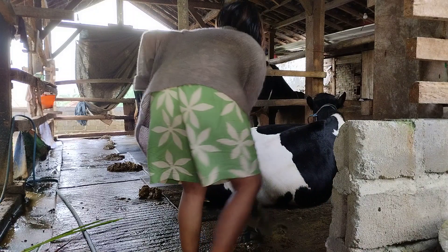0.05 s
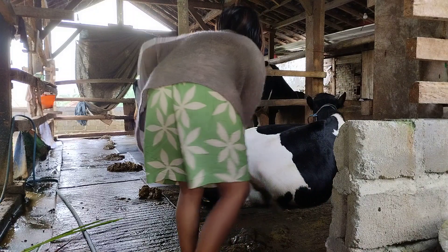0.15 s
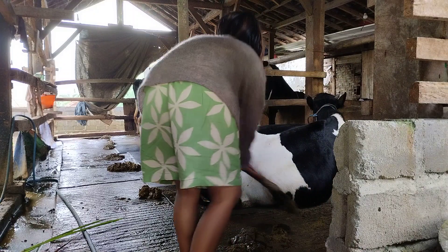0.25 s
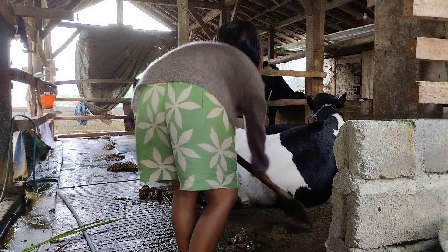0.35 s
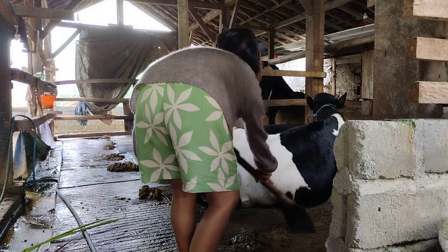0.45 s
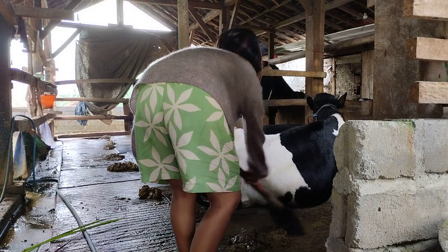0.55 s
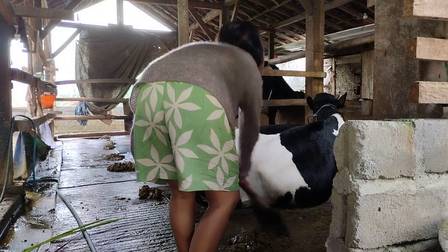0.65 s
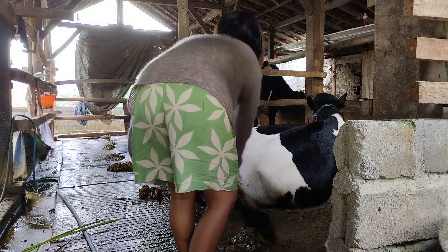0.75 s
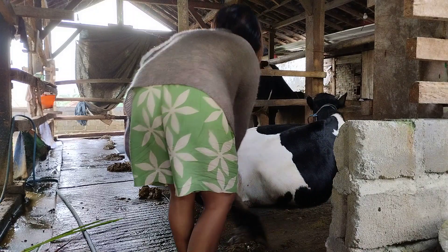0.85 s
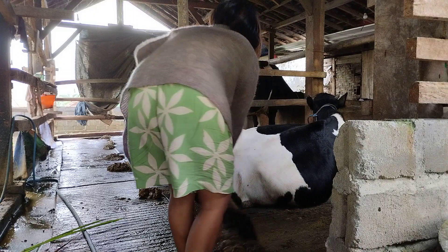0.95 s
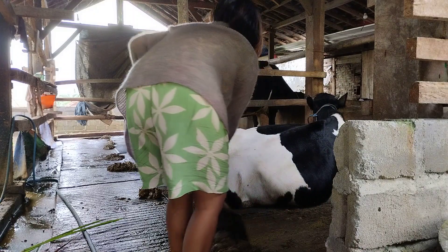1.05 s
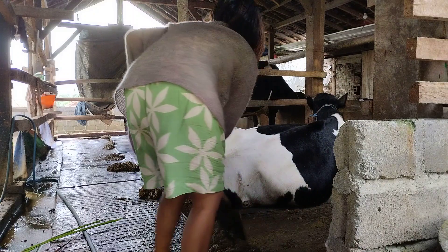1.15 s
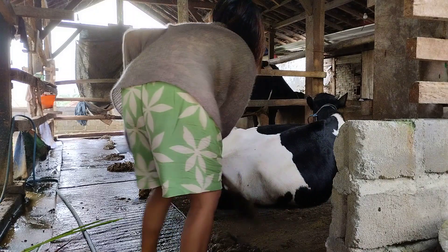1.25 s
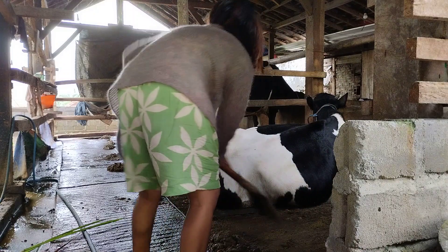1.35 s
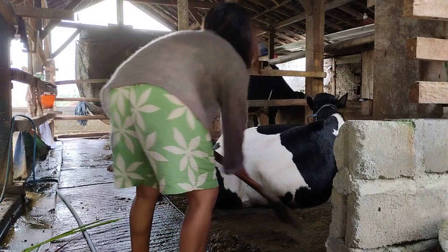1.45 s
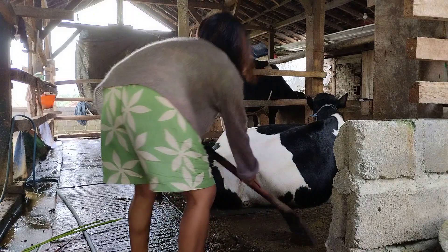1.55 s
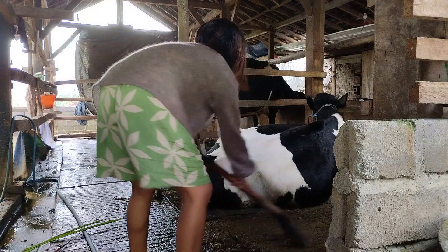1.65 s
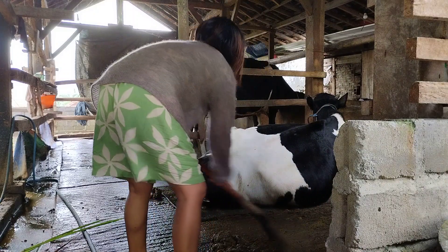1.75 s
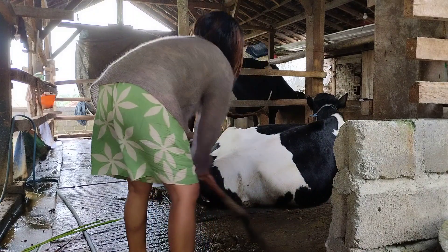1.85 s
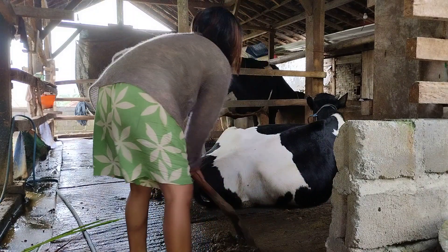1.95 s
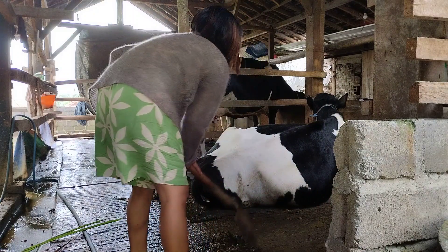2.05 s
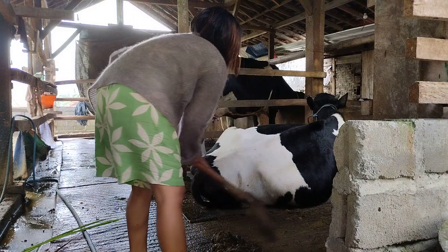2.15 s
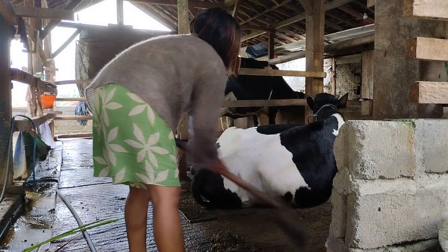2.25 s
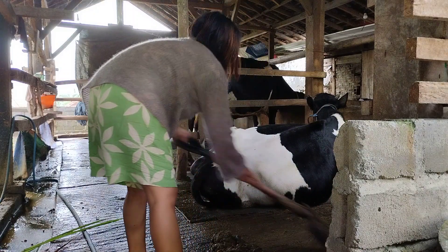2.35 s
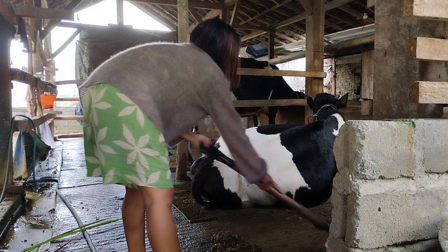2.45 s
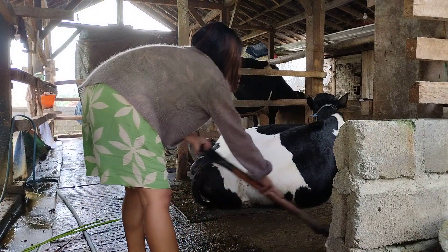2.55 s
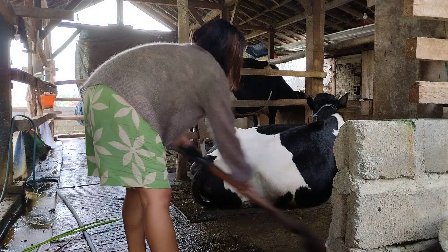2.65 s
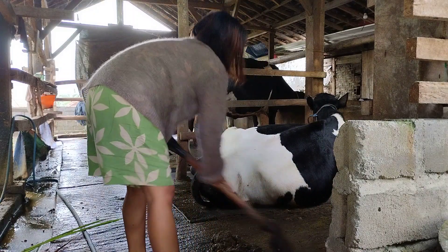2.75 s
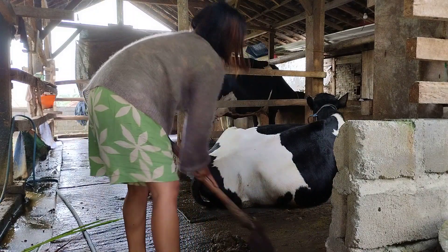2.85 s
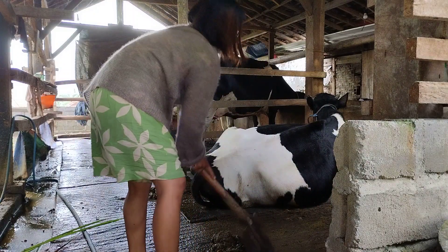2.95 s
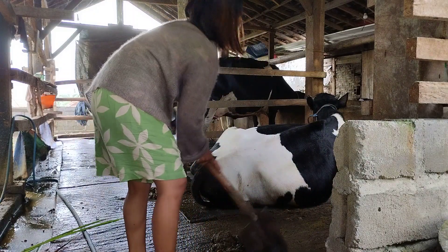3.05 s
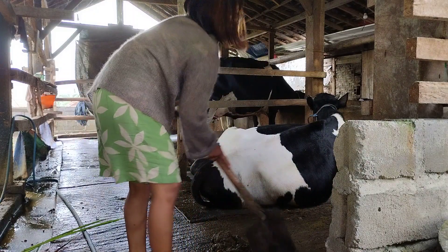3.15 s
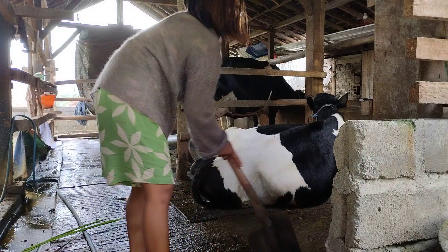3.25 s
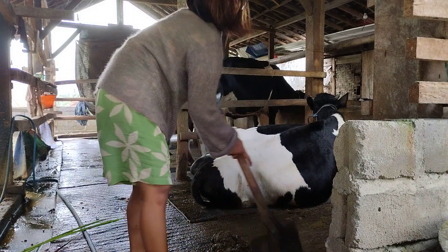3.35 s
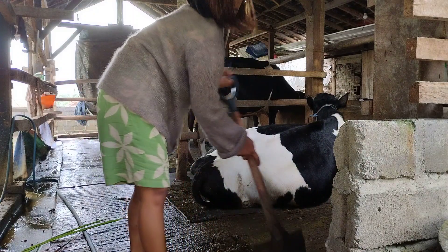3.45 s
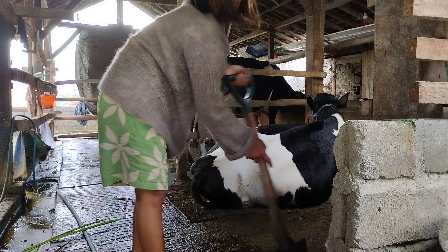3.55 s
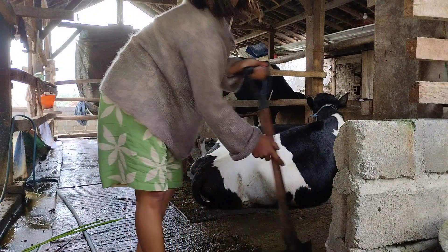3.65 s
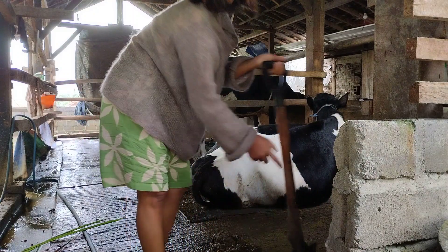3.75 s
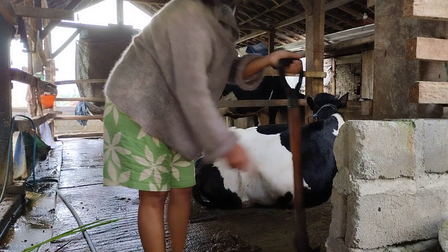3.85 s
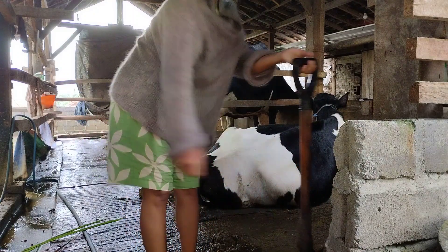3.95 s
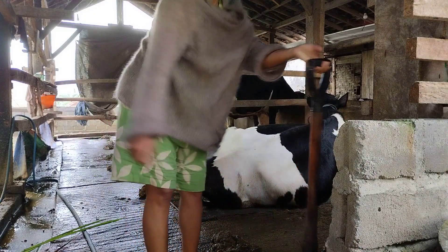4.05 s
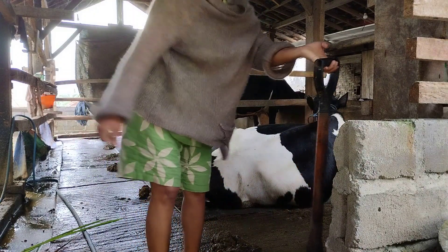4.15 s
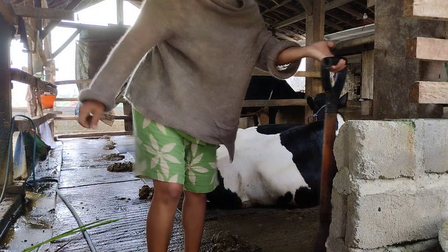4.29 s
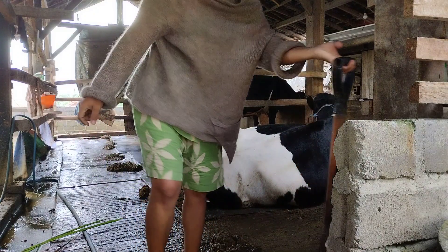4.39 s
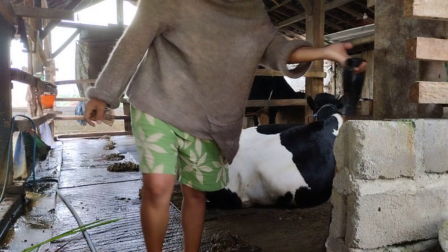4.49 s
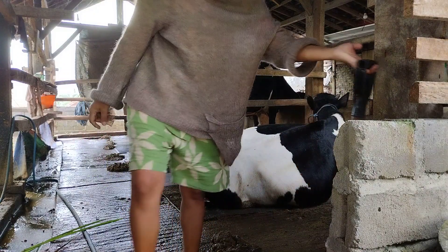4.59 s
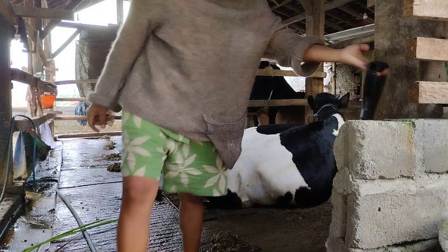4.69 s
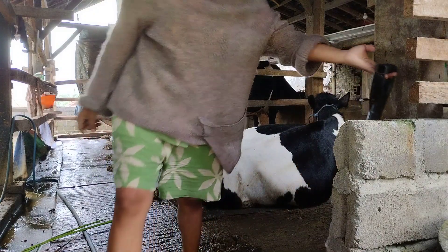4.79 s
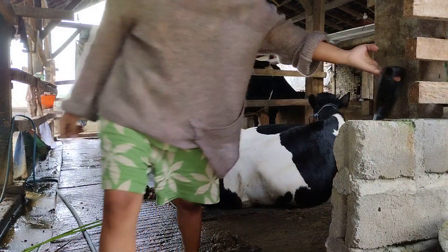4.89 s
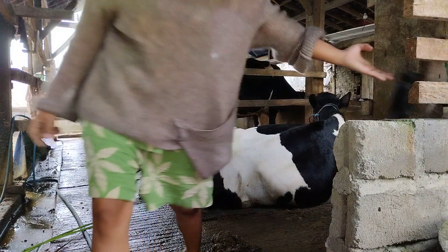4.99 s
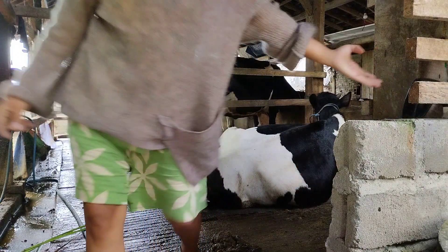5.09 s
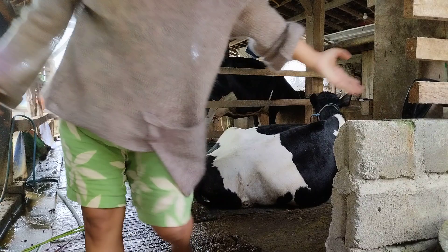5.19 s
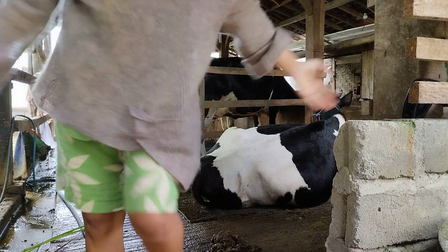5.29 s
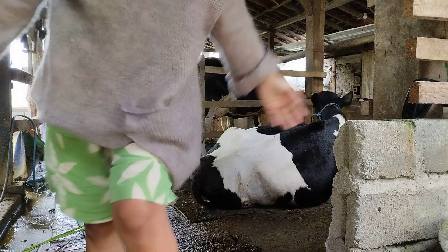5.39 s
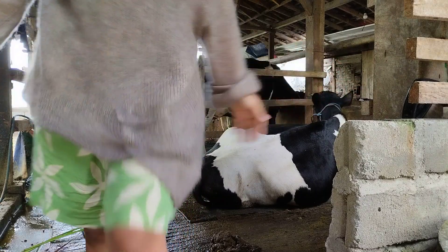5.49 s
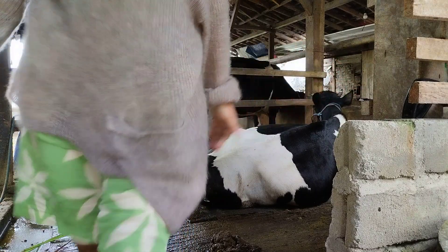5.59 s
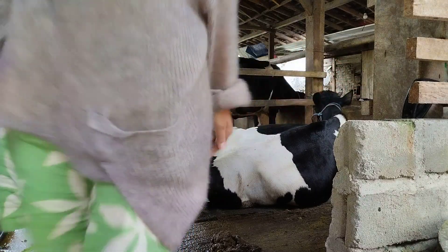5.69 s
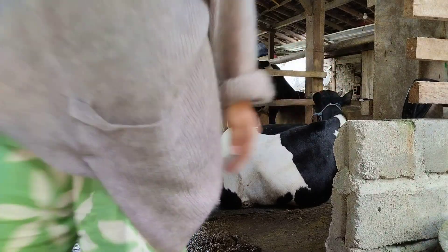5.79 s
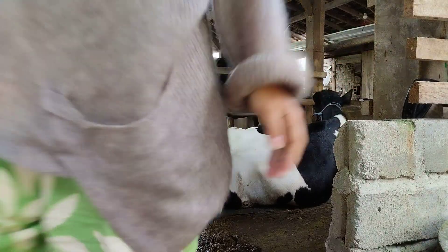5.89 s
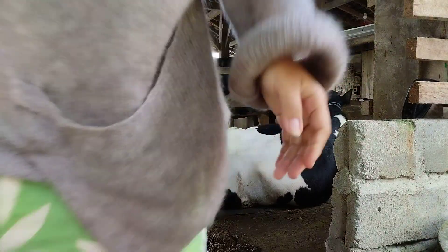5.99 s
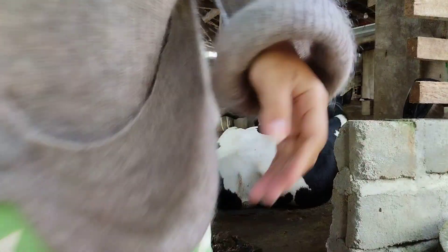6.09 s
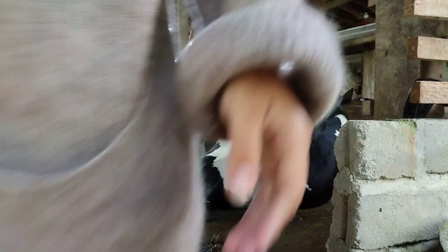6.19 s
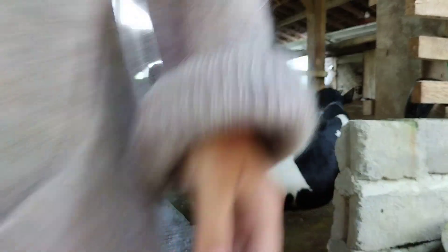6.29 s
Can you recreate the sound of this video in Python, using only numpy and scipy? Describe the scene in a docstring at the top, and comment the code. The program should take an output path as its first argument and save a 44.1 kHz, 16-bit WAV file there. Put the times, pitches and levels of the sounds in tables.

```python
"""A steel shovel lands on wet concrete, is pushed three times through muck and stood upright, then its
wooden handle knocks a block wall: blows and drag noise ring blade resonances, grit is grainy noise.
Around it in an open cowshed, small neck bells tinkle and far birds chirp (decaying and sliding tones),
wet feet tick and shuffle (noise bursts, low tones), and air rumbles, drones and hisses (shaped noise).
The timber roof answers shovel, feet and birds with a short tail of decaying noise."""
import sys
import numpy as np
from scipy import signal
from scipy.fft import rfft, irfft, next_fast_len
from scipy.io import wavfile
from scipy.ndimage import uniform_filter1d, map_coordinates

SR = 44100
rng = np.random.default_rng(int(sys.argv[2]) if len(sys.argv) > 2 else 0)


def unload_audio(sound):
    """Save the sound as a 16-bit wav file, at the path given as the first command line argument."""
    columns = np.transpose(np.atleast_2d(sound))
    # keep every value between -1 and 1, then stretch to whole-number steps
    steps = np.round(np.clip(columns, -1, 1) * 32767)
    wavfile.write(sys.argv[1], SR, steps.astype(np.int16))


N = 279134  # length [samples]


def amp(db):
    """Decibels to linear gain."""
    return 10 ** (np.asarray(db) / 20)


def unit(x):
    """x scaled to an RMS of one."""
    return x / np.sqrt(np.mean(x ** 2) + 1e-20)


def along(points, hz):
    """(frequency, value) points joined on a log frequency axis."""
    f, v = np.transpose(points)
    return np.interp(np.log(hz + 1), np.log(f + 1), v)


def curves(rows, outside=None):
    """One value per sample for each column after the time."""
    s, *columns = np.transpose(rows)
    return [np.interp(np.arange(N) / SR, s, c, outside, outside) for c in columns]


def wobble(rate):
    """A smooth random curve with `rate` knots a second."""
    knots = rng.standard_normal(int(N * rate / SR) + 4)
    return map_coordinates(knots, [np.arange(N) * rate / SR])


def filtered(x, response):
    """x times a complex response of frequency."""
    m = next_fast_len(N + SR // 2)
    return irfft(rfft(x, m) * response(np.fft.rfftfreq(m, 1 / SR)), m)[:N]


def evened(response):
    """The same response, scaled so that white noise keeps its level."""
    def even(hz):
        gain = response(hz)
        return gain / np.sqrt(np.mean(abs(gain) ** 2))
    return even


def coloured(x, spectrum):
    """x filtered to the shape of a spectrum table."""
    return filtered(x, evened(lambda hz: amp(along(spectrum, hz))))


def resonance(f, hz, width):
    """Response at f of one damped mode: gain 1 at hz, falling off over the bandwidth."""
    return 1j * f * width / (hz * hz - f * f + 1j * f * width)


def add(track, s, sound):
    """Mix a sound into a track from time s."""
    part = track[max(round(s * SR), 0):][:len(sound)]
    part += sound[:len(part)]


def burst(db, t60, size=SR // 5):
    """A sudden puff of noise that dies away."""
    t = np.arange(size) / SR
    return amp(db - 60 * t / max(t60, .002)) * rng.standard_normal(size)


def ring(modes, attack, scatter_db):
    """Decaying modes at scattered strengths; neighbours start in opposite directions, so close pairs beat."""
    t = np.arange(SR) / SR
    out = np.zeros(SR)
    for k, (hz, db, t60) in enumerate(modes):
        strength_db = db + scatter_db * rng.standard_normal()
        out += (-1) ** k * amp(strength_db - 60 * t / t60) * np.sin(2 * np.pi * hz * t)
    return out * (1 - np.exp(-t / attack))


def grains(spread_db, count=N):
    """Dense contacts of sand and ridges: a few are much larger than the rest, none enormous."""
    size = np.minimum(rng.exponential(size=count), 5)
    return unit(amp(spread_db * size) * rng.standard_normal(count))


def patchy(x, patchy_db, wide, long, window=256):
    """x with random gain in patches, wide bins by long frames."""
    z = signal.stft(x, nperseg=window)[2]
    field = uniform_filter1d(rng.standard_normal(z.shape), wide, axis=0)
    field = uniform_filter1d(field, long, axis=1)
    return signal.istft(z * amp(patchy_db * unit(field)), nperseg=window)[1][:N]


# Air layers before wavering: (time [s], rumble level [dB], drone level [dB], hiss level [dB])
AIR_LEVELS = [(0, -56, -61, -55), (.3, -50.5, -63.5, -62), (1, -52, -57, -56), (2.2, -61, -59.5, -60),
              (3.3, -61, -58.5, -59), (3.8, -63, -60.5, -59), (4.5, -67, -57, -58.5),
              (5.4, -64, -61, -59.5), (6.33, -66, -57.5, -59.5)]
# Spectrum of the low rumble: (frequency [Hz], relative density [dB per Hz])
RUMBLE_SPECTRUM = [(8, -10), (18, -3), (30, 5.5), (45, -13), (60, -15), (80, -41)]
# Spectrum of the outside drone: (frequency [Hz], relative density [dB per Hz])
DRONE_SPECTRUM = [(29, -46), (50, -4), (75, 3), (92, 1), (123, 2.5), (151, -7), (167, -21), (250, -12.5),
                  (320, -55), (550, -120)]
# Spectrum of the hiss: (frequency [Hz], relative density [dB per Hz])
HISS_SPECTRUM = [(120, -7.5), (200, -0.5), (227, -3), (278, -4.5), (394, -4.5), (611, -4.5), (2080, -11),
                 (2950, -11.5), (3950, -15.5), (5110, -14), (5600, -7.5), (6030, -12.5), (8690, -6.5),
                 (15900, -29.5)]


def air():
    """Noise in three bands: low rumble, a drone from outside, a patchy hiss flecked with tiny drips."""
    rumble_db, drone_db, hiss_db = curves(AIR_LEVELS)
    flecks = amp(2.6 * wobble(40)) * grains(1.2)
    flecks = unit(patchy(flecks, patchy_db=1.86, wide=12, long=14, window=512))
    rumble = amp(rumble_db + 2.95 * wobble(4.94))
    rumble *= coloured(rng.standard_normal(N), RUMBLE_SPECTRUM)
    drone = amp(drone_db + 0.86 * wobble(1.77))
    drone *= coloured(rng.standard_normal(N), DRONE_SPECTRUM)
    return rumble + drone + amp(hiss_db) * coloured(flecks, HISS_SPECTRUM)


# Each neck bell: modes (frequency [Hz], relative level [dB], decay t60 [s]),
# then swings (time [s], level before scatter and waver [dB])
NECK_BELLS = [([(2287, 0.5, 0.42), (11540, 3.5, 0.33)], [(0, -61), (.16, -63), (.32, -56), (.95, -60),
              (1.11, -54), (2.02, -60), (3.26, -61), (4.99, -59), (5.4, -53)]), ([(6322, 0, 0.86),
              (6311, -9, 0.88)], [(.21, -60.5), (.36, -53), (.95, -54), (1.11, -52), (2.02, -58),
              (3.26, -60.5), (4.99, -59), (5.44, -55)]), ([(5920, 0.5, 0.63)], [(.03, -59), (.35, -56),
              (.52, -48), (.98, -55), (2.24, -59), (2.6, -56)]), ([(2470, -0.5, 1.8)], [(.342, -60),
              (1.06, -62.5), (4.455, -69)])]


def tinkles():
    """Small neck bells touched softly: a few decaying modes with a slow attack."""
    out = np.zeros(N)
    for modes, swings in NECK_BELLS:
        for s, db in swings:
            add(out, s, amp(db) * ring(modes, attack=0.023, scatter_db=1.5))
    return out * amp(2.9 * wobble(14))  # swinging makes the tones waver


PATTER_PER_S, PATTER_DB, PATTER_SPREAD_DB = 22, -42, 3
PATTER_BODY_DB = -10  # body relative to treble
TICK_T60_S, PATTER_T60_S = .005, .002


def patter():
    """Faint ticks at chance moments, half of them close after another: (s, treble dB, body dB, t60 s)."""
    draws = rng.random((round(PATTER_PER_S * N / SR), 3))
    s = draws[:, 0] * N / SR
    s[1::2] = s[::2][:len(s) // 2] + .03 * draws[1::2, 2]
    db = PATTER_DB - PATTER_SPREAD_DB * np.log(draws[:, 1] + .05)  # a few are stronger
    return [(a, b, b + PATTER_BODY_DB, PATTER_T60_S) for a, b in zip(s, db)]


# Wet ticks, levels before filtering: (time [s], treble level [dB], body level [dB])
WET_TICKS = [(0.2778, -37, -46), (0.2928, -36, -48), (0.3424, -32.5, -61), (1.1313, -37, -48),
             (1.2466, -27.5, -50), (1.471, -43, -39.5), (2.4418, -31.5, -44), (3.109, -35, -47),
             (3.172, -37, -47), (3.2045, -34, -43), (3.2488, -37, -39), (3.3058, -41, -42),
             (3.4405, -40.5, -40.5), (3.5016, -31.5, -43), (3.5537, -42, -35.5), (3.7274, -33, -37),
             (3.8955, -44, -52), (4.0433, -34, -46), (4.192, -40, -38), (4.4533, -59, -50),
             (4.7264, -43, -43.5), (4.8474, -44, -39.5), (5.032, -32.5, -44), (5.4064, -43, -46),
             (5.6364, -36, -43), (5.8127, -35, -49), (5.8795, -41, -51), (6.0077, -45, -52)]
# Shuffling feet: (centre time [s], length [s], level [dB], band centre [Hz])
FOOT_SHUFFLES = [(0.022, 0.082, -60, 2920), (0.281, 0.067, -61, 2500), (1.245, 0.17, -59.5, 2500),
                 (3.191, 0.055, -60, 5000), (3.997, 0.045, -49, 1430), (4.329, 0.067, -56, 1420),
                 (4.865, 0.049, -61.5, 2030), (5.643, 0.017, -48.5, 820), (5.707, 0.058, -56, 8000),
                 (5.938, 0.041, -56, 700)]
# Low footfalls and thuds: (time [s], level [dB], frequency [Hz])
LOW_THUMPS = [(0.171, -39, 69), (1.039, -43, 110), (1.169, -42, 132), (1.342, -35, 49.4),
              (1.637, -27, 88.5), (2.542, -36, 90), (3.46, -41, 59.4), (5.634, -46.5, 113),
              (.492, -24, 163), (2.8, -40, 90)]


def feet():
    """Wet ticks are short noise bursts, shuffles are swelling bands of grains, footfalls are low tones."""
    treble, body, steps = np.zeros((3, N))
    soft = 1 - np.exp(-np.arange(SR // 50) / SR / 0.0002)  # rounds the onset of a tick
    ticks = [(*row, TICK_T60_S) for row in WET_TICKS] + patter()
    for s, db, body_db, t60 in ticks:
        add(treble, s, burst(db, t60, size=len(soft)) * soft)
        add(body, s, burst(body_db, t60, size=len(soft)) * soft)

    t = np.arange(-SR // 4, SR // 4) / SR
    for s, length, db, hz in FOOT_SHUFFLES:
        band = signal.butter(1, [hz / 2, 2 * hz], "bandpass", fs=SR)
        rub = signal.lfilter(*band, grains(4.3, count=len(t)))
        add(steps, s, amp(db) * unit(rub) * np.exp(-(2 * t / length) ** 2))
    steps = np.roll(steps, -SR // 4)  # a shuffle is centred on its time
    for s, db, hz in LOW_THUMPS:
        add(steps, s, ring([(hz, db, .1)], attack=.005, scatter_db=0))

    ridge = lambda hz: amp(along(GRIT_SPECTRUM, hz)) * hz / (hz + 3000)
    treble = filtered(treble, evened(ridge))
    body = filtered(body, evened(lambda f: resonance(f, 1360, 1900)))
    return treble + body + steps


# Brief far squeaks and bird notes, before wavering:
# (centre time [s], length [s], first frequency [Hz], last frequency [Hz], level [dB])
BIRD_CHIRPS = [(0.155, 0.046, 5050, 4770, -68), (0.45, 0.054, 5400, 4730, -64),
               (1.185, 0.024, 3200, 3190, -57), (2.504, 0.06, 4910, 4720, -63),
               (3.704, .025, 4870, 4730, -58), (3.976, 0.027, 1800, 1820, -60),
               (4.21, 0.048, 2800, 2770, -57), (4.548, 0.032, 1160, 1090, -46),
               (4.567, 0.0556, 1537, 1610, -57), (5.517, 0.02, 4820, 4880, -59.5),
               (5.931, 0.036, 955, 743, -46.5), (6.014, 0.023, 8950, 8950, -54)]


def chirps():
    """Short husky tones that swell, slide and stop, with random waver in pitch and level."""
    out = np.zeros(N)
    waver = 1 + .08 * wobble(150)
    for s, length, first_hz, last_hz, db in BIRD_CHIRPS:
        hz = np.linspace(first_hz, last_hz, round(length * SR))
        hz = hz * waver[round(s * SR):][:len(hz)] ** (1000 / hz)  # low squeaks are the least steady
        tone = np.sin(2 * np.pi * np.cumsum(hz) / SR)
        add(out, s - length / 2, amp(db) * np.hanning(len(hz)) * tone)
    return out * amp(5.5 * wobble(150))


SLOW_BLADE_DB, SLOW_GRIT_DB = -6, -14.5  # how much quieter blade and grit set off
LIFT_S, LIFT_DB = .03, -28  # the edge leaves the floor


def push(start, speed, hardest, lift, speed_db, hardest_db, lift_db, slow_db):
    """Level of one push: sets off slowly, comes to speed, bears down, eases and lifts away."""
    points = [(start, speed_db + slow_db), (speed, speed_db), (hardest, hardest_db),
              (lift, lift_db), (lift + LIFT_S, lift_db + LIFT_DB)]
    return curves(points, outside=-120)[0]


def blow(db, hz, t60):
    """One push and rebound, shorter for a harder contact, then a dying rattle of smaller ones."""
    u = 2 * np.pi * hz * np.arange(SR // 50) / SR
    rattle = burst(-20.0, t60)
    rattle[0] = 1  # the blow itself
    return -amp(db) * signal.fftconvolve((1 - u) * np.exp(-u), rattle)


# Pushes, levels before judder: (sets off [s], at speed [s], hardest [s], lifts [s],
# level at speed [dB], hardest level [dB], lifting level [dB], grit over blade [dB])
PUSHES = [(.53, 0.606, 0.853, .88, -35, -34.5, -44, -3), (1.671, 1.746, 1.9, 2.012, -29.5, -26, -38.5, -4),
          (2.65, 2.718, 2.825, 2.955, -34, -23.5, -38.5, -5)]
# The edge lands or catches, levels before filtering:
# (time [s], blow level [dB], hardness [Hz], rattle t60 [s], crack level [dB])
EDGE_LANDINGS = [(.492, -22, 455, 0.091, -37), (.503, -27, 900, 0.026, -24.5), (.509, -19, 445, 0.085, -33),
                 (.575, -28, 500, 0.034, -52), (.748, -38, 900, 0.027, -36),
                 (.863, -36, 1200, 0.024, -29.5), (1.637, -19.5, 550, 0.12, -38),
                 (1.66, -24.5, 500, 0.036, -52), (1.69, -33, 700, .03, -39.5),
                 (1.728, -37, 900, 0.032, -28.5), (1.804, -34, 900, 0.033, -27),
                 (1.838, -33, 900, .05, -23), (2.034, -26, 600, 0.027, -58), (2.575, -23, 486, 0.22, -38.5),
                 (2.698, -28, 900, 0.18, -27), (3.677, -24.5, 690, 0.037, -39)]
CRACK_SHARE = 0.88  # the crack dies in this share of the rattle's time
# Resonances of the steel blade: (frequency [Hz], width [Hz], relative level [dB])
BLADE_MODES = [(222, 46, -11.5), (283, 32, -6.5), (342.5, 42, -4), (450, 44.5, -2), (528, 46, -0.5),
               (613, 40, -1), (660, 47, -3), (839, 86, -9), (1147, 140, -16), (1247, 110, -21),
               (1504, 92, -19.5), (1940, 250, -30), (2590, 210, -22), (134, 56, -14.5)]
# Spectrum of crushed grit: (frequency [Hz], relative density [dB per Hz])
GRIT_SPECTRUM = [(710, -12.5), (1200, -10.5), (1560, -12), (1700, -14), (2350, -15), (2560, -18),
                 (2910, -19), (5280, -26), (9260, -13.5), (12300, -25), (15900, -31)]


def shovel():
    """Landings and the dragged edge shake the same blade; grit crushes under the edge."""
    drag, blows, crush = np.zeros((3, N))
    judder = wobble(45)  # the edge catches and slips over the rough floor
    for *shape, grit_db in PUSHES:
        drag += amp(push(*shape, SLOW_BLADE_DB) + 1.97 * judder) * grains(3.8)
        crush_db = push(*shape, SLOW_GRIT_DB) + grit_db
        crush_db += 1.5 * judder + 1.2 * wobble(160)
        crush += amp(crush_db) * grains(2.86)
    crush = patchy(crush, patchy_db=2.5, wide=12, long=5)  # coarse and fine grit come in patches
    for s, db, hz, t60, crack_db in EDGE_LANDINGS:
        add(blows, s, blow(db, hz, t60))
        add(crush, s, burst(crack_db, CRACK_SHARE * t60))

    def steel(step):
        """Blade response; mode k is weighted by step to the power k."""
        return evened(lambda f: sum(step ** k * amp(db) * resonance(f, hz, width)
                                    for k, (hz, width, db) in enumerate(BLADE_MODES)))

    # a blow starts all modes together; the dragged edge drives neighbours in opposite directions
    struck, scraped = filtered(blows, steel(0.83)), filtered(drag, steel(-1.007))
    return struck + scraped + coloured(crush, GRIT_SPECTRUM)


# Shovel struck along its length: (frequency [Hz], relative level [dB], decay t60 [s])
UPRIGHT = [(211, -3.5, 0.059), (283, -5, 0.068), (578, 1, 0.045), (698, 4.5, 0.04), (799, 3, 0.054),
           (926, 6.5, 0.024), (1157, -4, 0.03), (1360, -1.5, 0.032), (1825, -21, .03)]
# Wooden shaft struck from the side: (frequency [Hz], relative level [dB], decay t60 [s])
HANDLE = [(149, -14, 0.07), (196, -10, 0.1), (270, -10.5, 0.13), (476, -2.5, 0.055), (662.3, 4, 0.11),
          (652, -2, 0.14), (910, -13, 0.052), (1160, -3.5, 0.047), (1290, -6.5, 0.06), (1660, -11.5, 0.051),
          (2200, -15, 0.067), (3250, 0.5, 0.016)]
# Tip on the floor, then handle on the wall, levels before filtering: (modes, time [s],
# ring level [dB], clatter level [dB], clatter t60 [s], crack level [dB])
SHOVEL_KNOCKS = [(UPRIGHT, 3.628, -21.5, -25.5, 0.088, -34), (HANDLE, 5.111, -15.5, -25, 0.21, -23.5)]


def handle():
    """The whole shovel rings briefly when it is set down and when it falls against the wall."""
    wood, clatter, crack = np.zeros((3, N))
    for modes, s, ring_db, clatter_db, t60, crack_db in SHOVEL_KNOCKS:
        add(wood, s, amp(ring_db) * ring(modes, attack=.002, scatter_db=0))
        add(clatter, s, burst(clatter_db, t60))  # the loose blade clatters along
        add(crack, s, burst(crack_db, 0.12))
    wood = filtered(wood, lambda hz: 1j * hz / (90 + 1j * hz))  # deep bass below about 90 Hz is kept out of the ring
    loose_blade = lambda f: resonance(f, 535, 480) * resonance(f, 670, 1160)
    dull = lambda hz: amp(along(GRIT_SPECTRUM, hz)) / (1 + (hz / 9000) ** 2)
    return wood + filtered(clatter, evened(loose_blade)) + filtered(crack, evened(dull))


# Decay of the shed's tail: (frequency [Hz], decay t60 [s])
SHED_DECAY = [(50, .06), (150, 0.33), (600, 0.38), (2000, 0.27), (8000, 0.29), (15000, 0.34)]


def shed(x):
    """Each frequency of the tail dies at its own speed; every stretch of sound meets a new tail."""
    out, size = np.zeros(N), SR // 8
    for start in range(0, N, size):
        hz, t, z = signal.stft(rng.standard_normal(SR // 2), SR, nperseg=256)
        decay = amp(-60 * t / along(SHED_DECAY, hz)[:, None])
        tail = signal.istft(z * decay, SR, nperseg=256)[1]
        tail /= np.linalg.norm(tail)
        add(out, start / SR + .006, signal.fftconvolve(x[start:start + size], tail))
    return out


def scene():
    """Shovel, feet and birds sound with the shed's tail; bells and air are added without it."""
    near = shovel() + handle() + feet()
    far = chirps()
    tail = shed(amp(-6.5) * near + amp(-7) * far)
    return (near + far + tail + tinkles() + air())[None]


TOP_HZ = 15900


def record(dry):
    """Nothing is kept above the band limit."""
    return filtered(dry[0], lambda hz: hz < TOP_HZ)[None]


dry = scene()
out = record(dry)
unload_audio(out)
```